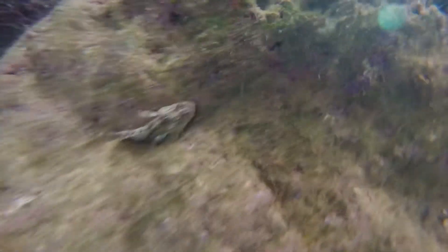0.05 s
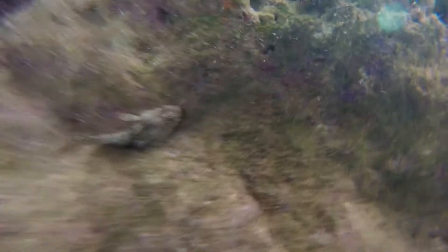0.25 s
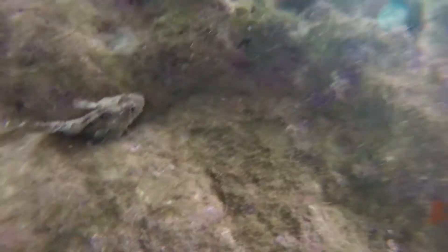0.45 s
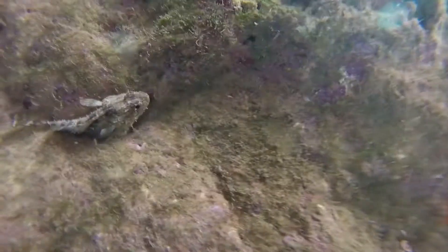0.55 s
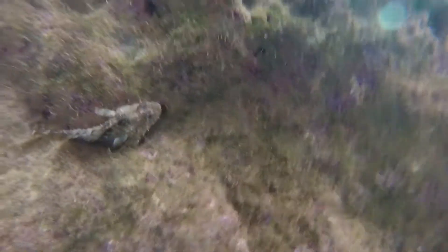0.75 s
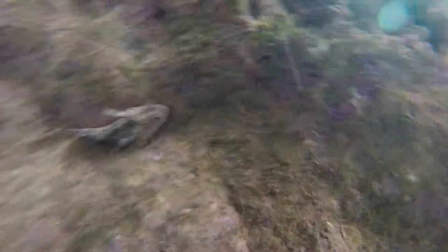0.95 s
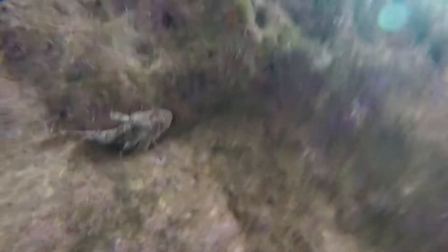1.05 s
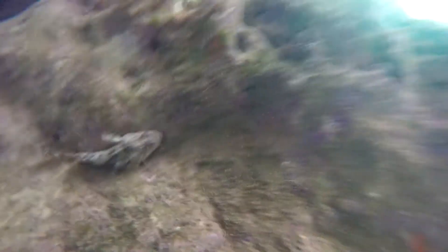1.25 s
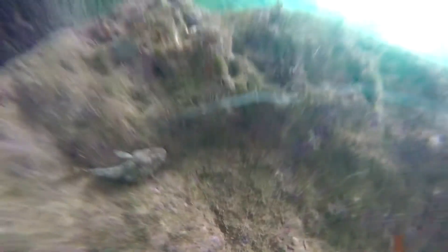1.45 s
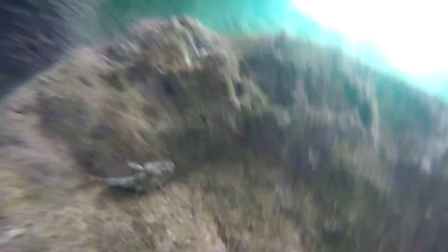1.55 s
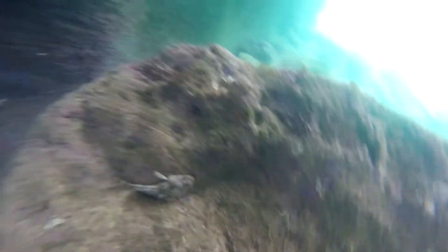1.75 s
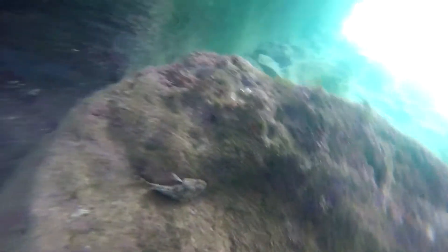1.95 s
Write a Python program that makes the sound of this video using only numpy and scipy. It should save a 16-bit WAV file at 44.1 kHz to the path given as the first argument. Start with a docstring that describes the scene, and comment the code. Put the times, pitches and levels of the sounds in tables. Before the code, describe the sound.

A muffled, low rumble of water sways around a camera underwater. Early on, its case shudders and takes one sharp knock, followed by lighter clicks and small gurgling bubbles over a faint hiss, all heard from inside the case.

```python
"""Water sways against a camera's watertight case, and its fluctuating pressure is heard as a deep rumble.
The case is moved by hand over rocks in shallow water: it shudders in the grip, and impacts excite its
damped modes, the low ones as thumps and the higher ones as clicks. Bubbles resonate as they gurgle and
fizz, and a faint crackle ticks over a thin, steady hiss."""
import sys
import numpy as np
from scipy import signal
from scipy.fft import rfft, irfft
from scipy.io import wavfile
from scipy.ndimage import uniform_filter1d

SR = 44100
rng = np.random.default_rng(int(sys.argv[2]) if len(sys.argv) > 2 else 0)


def unload_wav(signal):
    """Save mono or channel-first audio to the path in sys.argv[1] as 16-bit WAV at rate SR, clipped to [-1, 1]."""
    wavfile.write(
        sys.argv[1],
        SR,
        np.round(np.clip(np.atleast_2d(signal).T, -1, 1) * 32767).astype(np.int16),
    )


N = 88200
TIME = np.arange(N) / SR


def from_db(db):
    """Amplitude ratio of a level in decibels."""
    return 10 ** (np.asarray(db) / 20)


def unit_rms(x):
    """Normalisation to unit mean power."""
    return x / np.sqrt(np.mean(x ** 2) + 1e-20)


def curves(rows):
    """Linear interpolation of each column over time."""
    times_s, *columns = np.transpose(rows)
    return [np.interp(TIME, times_s, column) for column in columns]


def noise(spectrum):
    """Spectral shaping: coloured noise of rms 1 that rolls off steeply past both ends."""
    hz, db = np.transpose(spectrum)
    bins_hz = np.arange(1, N + 2) * SR / (2 * N)
    colour = from_db(np.interp(np.log(bins_hz), np.log(hz), db))
    gain = colour / (1 + (hz[0] / bins_hz) ** 4) / (1 + (bins_hz / hz[-1]) ** 4)
    return unit_rms(irfft(rfft(rng.standard_normal(2 * N)) * gain)[:N])


def drift(hz):
    """Random modulation of rms 1 in the decade below hz."""
    return noise([(hz / 10, 0), (hz, 0)])


def resonator(drive, hz, t60_s):
    """Damped oscillator: its impulse response is a decaying sine of height 1."""
    radius, angle = from_db(-60 / (t60_s * SR)), 2 * np.pi * hz / SR
    return signal.lfilter([0, np.sin(angle)], [1, -2 * radius * np.cos(angle), radius ** 2], drive + 1e-18)


def add(out, start_s, sound):
    """Superposition of a sound from its start time."""
    start = int(np.clip(start_s * SR, 0, N - 1))
    out[start:start + len(sound)] += sound[:N - start]


def impulses(per_s, spread_db):
    """Poisson process of impulses, most small and a few large."""
    sizes = from_db(spread_db * np.minimum(rng.exponential(1, N), 2.5))
    return (rng.random(N) < per_s / SR) * sizes * rng.choice([-1, 1], N)


def swarm(low_hz, high_hz, per_s, t60_cycles=27):
    """Tiny bubbles of equal quality factor resonate at random times; rms 1."""
    pitches = np.geomspace(low_hz, high_hz, num=20)
    out = 0
    for hz in pitches:
        onsets = impulses(per_s / len(pitches), spread_db=6.5)
        out += np.sqrt(hz) * resonator(onsets, hz, t60_cycles / hz)
    return unit_rms(out)


# Spectrum of the hiss: frequency_hz, relative_density_db
HISS_SPECTRUM = [(1500, -6), (3300, -12), (3800, -20), (4100, -2.5), (4500, -9.5), (5900, -4.5),
                 (6500, 3.5), (7200, -0.5), (9000, -4), (10300, -12.5), (11800, -9), (13500, -13),
                 (15000, -41)]
def hiss():
    """Stationary noise with one narrow resonant peak makes a thin hiss."""
    whistle = unit_rms(resonator(rng.standard_normal(N), hz=6545, t60_s=.012))
    return from_db(-56) * noise(HISS_SPECTRUM) + from_db(-62) * whistle


# Envelope of the finest bubbles: time_s, relative_level_db
FIZZ_ENVELOPE = [(0.0, -53.5), (0.24, -55.5), (0.47, -70.5), (0.71, -56), (1.0, -51), (1.32, -54.5),
                 (2.0, -59)]
# Spectrum of the wash under them: frequency_hz, relative_density_db
FIZZ_SPECTRUM = [(1200, 9.5), (2400, 8), (3000, 11), (4200, -21)]
def fizz():
    """Bubble resonance rises as radius falls: the finest bubbles fizz over a soft wash."""
    level_db, = curves(FIZZ_ENVELOPE)
    ringing = swarm(low_hz=1404, high_hz=2760, per_s=500)
    return from_db(level_db) * (from_db(-7) * ringing + from_db(-4) * noise(FIZZ_SPECTRUM))


# Stirring of the water: time_s, relative_level_db
CHURN_ENVELOPE = [(0.0, -46.5), (0.23, -44.5), (0.41, -42.5), (0.77, -49), (1.06, -44), (1.3, -49.5),
                  (1.55, -49), (2.0, -44.5)]
# Spectrum of its wash: frequency_hz, relative_density_db
WASH_SPECTRUM = [(130, -3), (250, -11), (400, -6.5), (700, 0.5), (950, -2), (1250, -17.5), (1600, -5)]
def gurgle():
    """Small bubbles resonate in stirred water and sum incoherently to a gurgle over a soft wash."""
    level_db, = curves(CHURN_ENVELOPE)
    ringing = swarm(low_hz=391, high_hz=1099, per_s=170)
    return from_db(level_db) * (from_db(-3.5) * ringing + from_db(-2) * noise(WASH_SPECTRUM))


# Larger bubbles: start_s, level_db, pitch_hz, t60_s
LARGE_BUBBLES = [(.002, -28.5, 708, 0.035), (.063, -25.5, 788, 0.032), (.547, -31, 483, 0.051),
                 (.834, -31, 423, 0.031), (.6185, -21, 585, 0.037), (.678, -33, 458, 0.081),
                 (.695, -29.5, 410, 0.081), (.74, -32.5, 260, 0.031), (.768, -32, 366, 0.047),
                 (.928, -38, 932, 0.096), (.996, -35, 852, 0.07), (1.031, -33, 1443, 0.074),
                 (1.118, -31, 647, 0.22), (1.126, -34.5, 1120, 0.079), (1.15, -18.5, 446, 0.012),
                 (1.332, -36, 1020, 0.065), (1.498, -29, 742, 0.051), (1.756, -36, 649, 0.17),
                 (1.815, -34.5, 750, 0.048), (1.846, -34.5, 352, 0.14), (1.902, -36.5, 661, 0.11),
                 (1.9808, -20, 833, 0.03), (1.9812, -30.5, 447, 0.065)]
def bubbles(relative_rise_per_s=.74, attack_s=.00056):
    """Each bubble is a damped oscillator, air the spring and water the mass, rising a little in pitch."""
    out, t = np.zeros(N), TIME[:N // 10]
    for start_s, db, hz, t60_s in LARGE_BUBBLES:
        envelope = from_db(db - 60 * t / t60_s) * (1 - np.exp(-t / attack_s))
        cycles = hz * t * (1 + relative_rise_per_s * t / 2)
        add(out, start_s, envelope * np.sin(2 * np.pi * cycles))
    return out


# Normal modes of the case, for crackle and clicks: pitch_hz, relative_level_db, t60_s
CASE_MODES = [(330, 7.5, 0.031), (711, 13, 0.011), (750, -1, 0.024), (1025, 0, 0.016), (1566, -1, 0.027),
              (1740, 1.5, 0.012), (1890, 1.5, 0.012), (2210, 2.5, 0.013), (2653, 4, 0.012),
              (2932, 3, 0.012), (3434, -7, 0.018), (3740, -4, 0.0095), (4063, -1, 0.016),
              (4602, -5.5, 0.014), (5320, -5, 0.013), (6387, -6.5, 0.02)]
def crackle(centre_hz=4120, width_octaves=.38):
    """Impulse responses of single high modes of the case tick as faint, random pips."""
    pips = 0
    for hz, db, t60_s in CASE_MODES:
        if hz > 2000:
            weight = from_db(db / 2) / np.hypot(1, np.log2(hz / centre_hz) / width_octaves)
            pips += weight * resonator(impulses(per_s=66, spread_db=5.5), hz, t60_s)
    return from_db(-60.5) * unit_rms(pips)


def click(brightest_hz, width_octaves, contact_s):
    """Impact excitation: the case's modes swell during contact, most around one pitch, then decay."""
    t = TIME[:N // 20]
    ringing = 0
    for hz, db, t60_s in CASE_MODES:
        weight = np.exp(-.5 * (np.log2(hz / brightest_hz) / width_octaves) ** 2) + from_db(-19)
        decay = from_db(db - 60 * t / t60_s)
        ringing += weight * decay * np.sin(2 * np.pi * (hz * t + rng.random()))
    ringing *= 1 - np.exp(-(t / contact_s) ** 2)
    grit = .065 * rng.standard_normal(len(t)) * np.exp(-t / .0024)   # the contact slips briefly
    return ringing / np.abs(ringing).max() + grit


# Hard contacts: start_s, relative_level_db, brightest_hz, width_octaves, contact_s
HARD_CONTACTS = [(0.0615, -37.5, 2970, 0.37, 0.0013), (0.176, -38, 2530, 0.41, 0.0008),
                 (0.2937, -31, 2500, 1.4, 0.0029), (0.2994, -27.5, 3800, 0.39, 0.00053),
                 (.3652, -10.5, 1700, 0.76, .0012), (.3660, -13.5, 3780, 0.2, 0.0015),
                 (.468, -35, 5500, 0.23, 0.00053), (.618, -19, 1470, 1.8, .0007),
                 (.7718, -31.5, 2570, 0.34, 0.0016), (0.917, -35.5, 5400, 0.1, .001),
                 (0.9411, -29, 3200, 2.2, 0.0012), (1.015, -38.5, 4080, 0.13, .001),
                 (1.174, -36, 5640, .15, 0.0012), (1.398, -38, 2490, 0.28, 0.00089),
                 (1.496, -39.5, 2900, .2, 0.0012), (1.584, -32, 3470, 0.37, 0.00072),
                 (1.66, -42.5, 3120, 0.53, 0.00089), (1.776, -38.5, 4560, 0.26, .001),
                 (1.8348, -22, 3250, 0.27, 0.00085), (1.8355, -27.5, 6200, 0.19, 0.001),
                 (1.8372, -19.5, 2730, 0.077, 0.0015)]
def clicks(gain_db=.5):
    """Short contacts have broad spectra, so hard handling reaches the case's high modes."""
    out = np.zeros(N)
    for start_s, db, *contact in HARD_CONTACTS:
        add(out, start_s, from_db(db + gain_db) * click(*contact))
    return out


def through_wall(sound, cutoff_hz=7700, leak_db=-25):
    """Transmission loss: the case wall acts as a low-pass, though a faint bright edge gets past."""
    wall = signal.butter(4, cutoff_hz, fs=SR, output="sos")
    return signal.sosfilt(wall, sound) + from_db(leak_db) * sound


# Soft bumps on the case: start_s, drive_db
SOFT_BUMPS = [(.3655, -9.5), (.466, -21), (0.7214, -23), (1.151, -27.5)]
# Lowest modes of the case: pitch_hz, gain_db, t60_s
LOW_MODES = [(94, 5.5, .075), (221, -19, .025), (300, -4, 0.035), (450, -40, 0.015)]
def thumps():
    """Free vibration: soft bumps push the case in and excite only its lowest modes."""
    blows = np.zeros(N)
    for start_s, db in SOFT_BUMPS:
        add(blows, start_s, -from_db([db]))
    return sum(from_db(db) * resonator(blows, hz, t60_s) for hz, db, t60_s in LOW_MODES)


# Vibration of the case in the grip: time_s, pitch_hz, level_db
SHUDDER_PATH = [(.2, 74.3, -96), (.216, 76, -35), (.235, 78.4, -29), (.255, 62.7, -24.5),
                (.28, 66.2, -27.5), (.3, 76.4, -16), (.318, 82.8, -22.5), (.335, 108.4, -19),
                (.36, 87, -16), (.395, 81.3, -28), (.415, 77.64, -24), (.44, 78.5, -92)]
# Spectrum of the rubbing grip: frequency_hz, relative_density_db
RUB_SPECTRUM = [(250, -5), (900, 5.5), (1300, -9), (2400, -2), (3300, -15), (4300, -10.5), (5000, -27)]
def shudder(pitch_jitter=.03, roughness_db=4):
    """A brief low vibration, randomly modulated in pitch and level, carries faint friction noise."""
    hz, db = curves(SHUDDER_PATH)
    cycles = np.cumsum(hz * (1 + pitch_jitter * drift(hz=30))) / SR
    envelope = from_db(db + roughness_db * drift(hz=29))
    vibration = np.sqrt(2) * np.sin(2 * np.pi * cycles)
    return envelope * (vibration + from_db(-23) * noise(RUB_SPECTRUM))


# Push of the water on the case: time_s, relative_level_db
FLOW_ENVELOPE = [(0.0, -51), (0.06, -35.5), (0.17, -45.5), (0.26, -27), (0.31, -32), (0.37, -20),
                 (0.52, -33.5), (0.61, -29.5), (0.89, -33.5), (0.91, -45), (0.95, -33), (1.15, -42.5),
                 (1.36, -31.5), (1.88, -43), (2.0, -34)]
# Spectrum of the slow eddies: frequency_hz, relative_density_db
SWAY_SPECTRUM = [(16, 9), (23, -0.5), (32, 0), (45, -5), (60, -17)]
# Spectrum of the rumble above them: frequency_hz, relative_density_db
RUMBLE_SPECTRUM = [(45, 6.5), (62, 2), (90, -3), (125, -9), (170, -12.5), (300, -10.5)]
def water_rumble(steady_s=.153, swing_share=.43):
    """Flow noise: slow eddies press on the case, and the rumble above follows part of their swing."""
    flow_db, = curves(FLOW_ENVELOPE)
    eddies = noise(SWAY_SPECTRUM)
    short_term_power = uniform_filter1d(eddies ** 2, int(steady_s * SR))
    sway = from_db(flow_db + 1) * eddies / np.sqrt(short_term_power + 1e-3)
    rumble_db = -42.5 + swing_share * (flow_db - flow_db.mean())
    return sway + from_db(rumble_db) * noise(RUMBLE_SPECTRUM)


def scene():
    """Superposition: all pressures add at one microphone inside the case."""
    rumble = water_rumble()
    handling = shudder() + thumps() + through_wall(clicks() + crackle())
    return (rumble + handling + bubbles() + gurgle() + fizz() + hiss())[None]


def record(dry):
    """Band limiting: an elliptic low-pass cuts the top treble steeply."""
    cutoff_hz = 14750
    return signal.sosfilt(signal.ellip(10, .2, 80, cutoff_hz, fs=SR, output="sos"), dry)


dry = scene()
out = record(dry)
unload_wav(out)
```